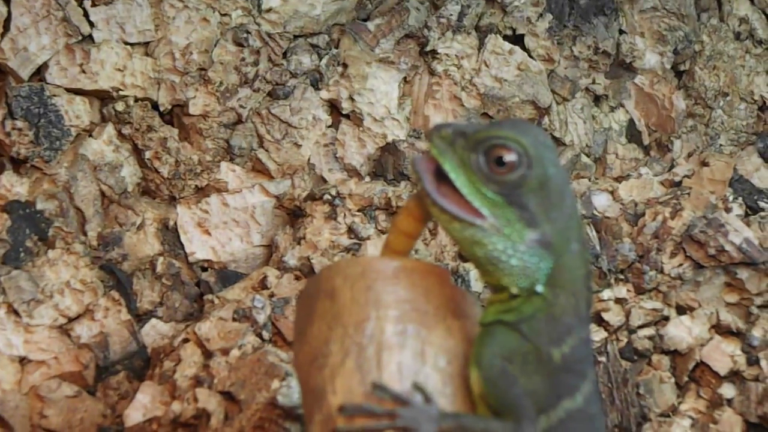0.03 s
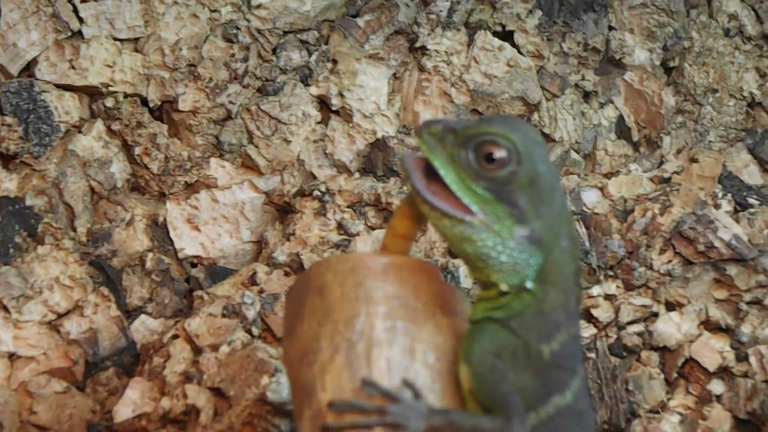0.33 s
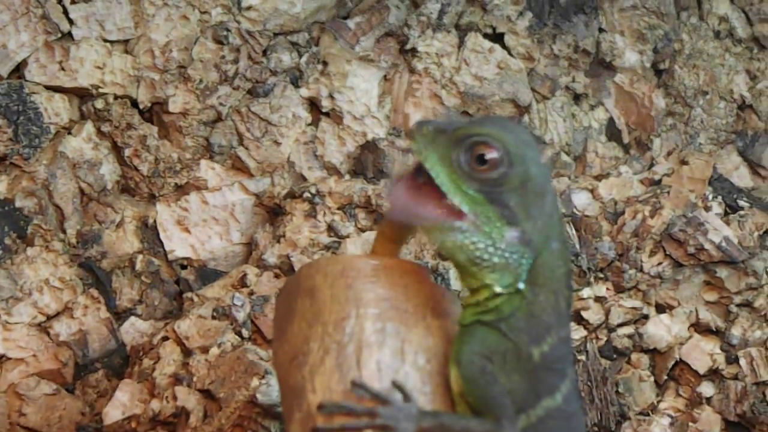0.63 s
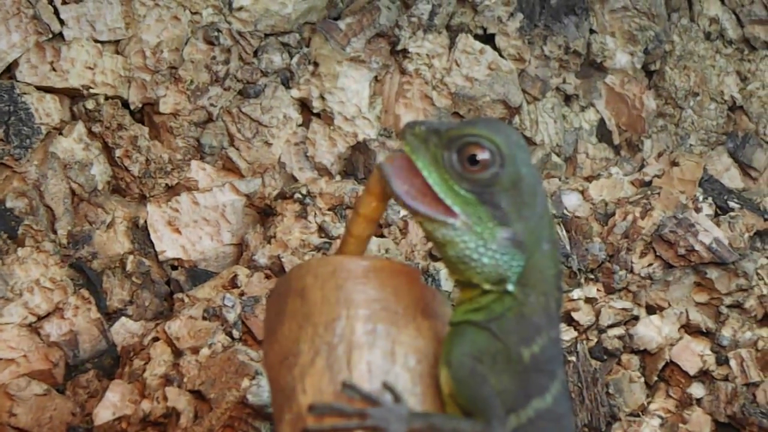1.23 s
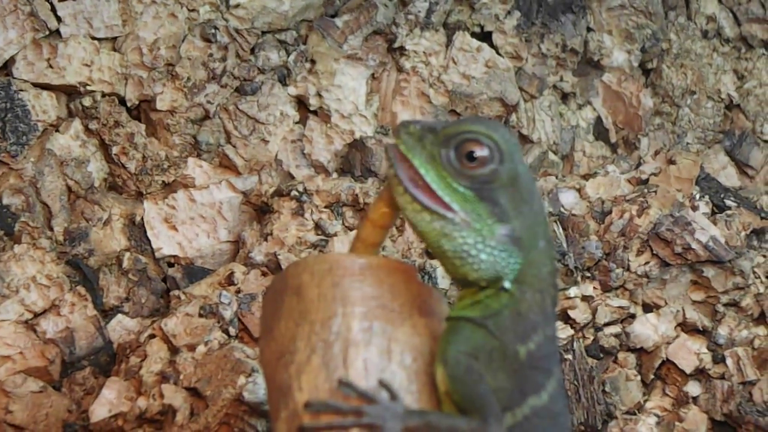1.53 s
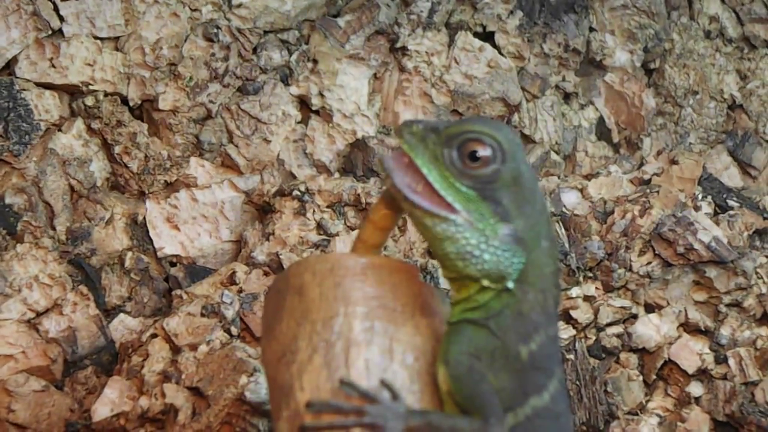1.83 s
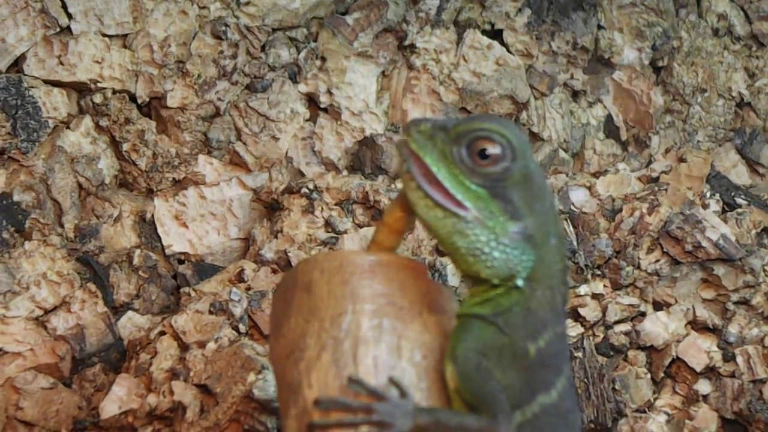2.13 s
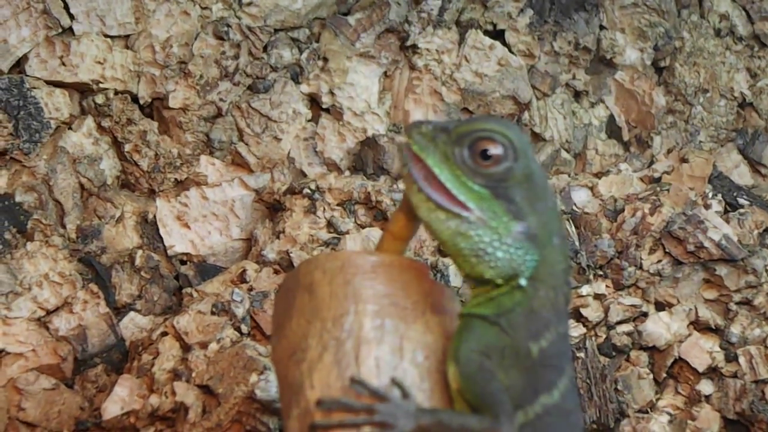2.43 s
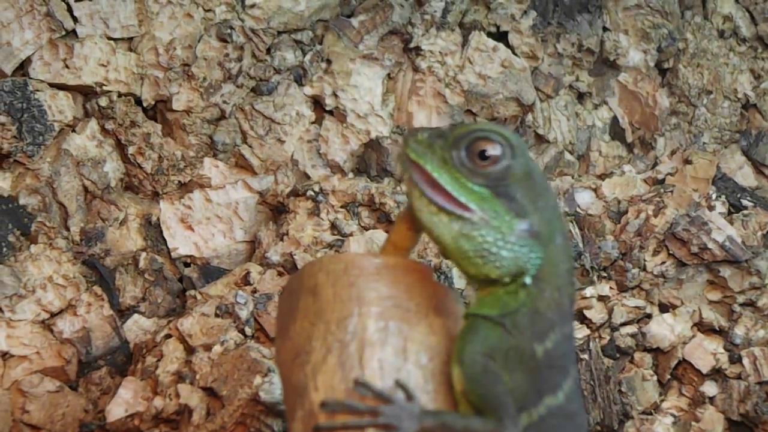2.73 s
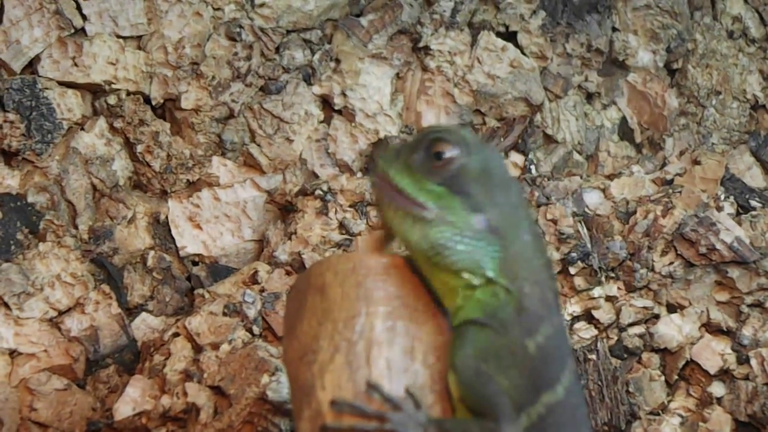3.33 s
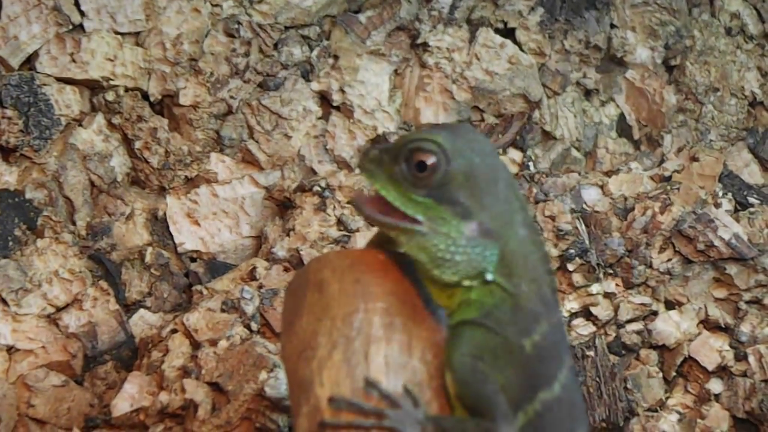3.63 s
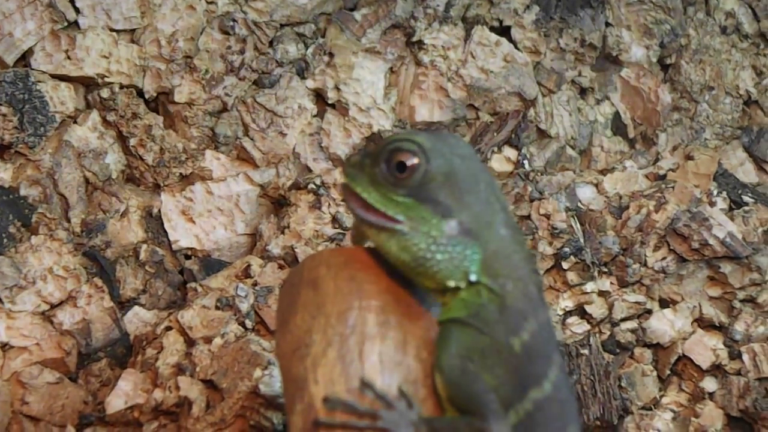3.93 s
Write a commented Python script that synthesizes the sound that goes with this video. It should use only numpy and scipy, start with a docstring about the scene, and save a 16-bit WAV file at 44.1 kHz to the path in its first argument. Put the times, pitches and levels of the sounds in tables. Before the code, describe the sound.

A lizard chews an insect close to the microphone in a tank. A quick run of soft crunches comes first, then scattered sharp cracks of shell, each with a slight ring, over a wavering hiss and faint low hum.

```python
"""In a tank, a lizard chews an insect close to a small microphone that rings near 3 kHz and 9 kHz.
The shell gives way in soft crunches and a few sharp cracks: impulses, each with a short rattle of
wall reflections, that strike those resonances. Behind it: a wavering resonant hiss, rumble, hum and
a low drone, faint rustles of the jaw, two dull bumps and a very faint tick once a second."""
import sys
import numpy as np
from scipy import signal
from scipy.fft import rfft, irfft
from scipy.io import wavfile
from scipy.ndimage import uniform_filter1d

SR = 44100
rng = np.random.default_rng(int(sys.argv[2]) if len(sys.argv) > 2 else 0)


def unload_audio(sound):
    """Save the sound as a 16-bit wav file, at the path given as the first command line argument."""
    columns = np.transpose(np.atleast_2d(sound))
    # keep every value between -1 and 1, then stretch to whole-number steps
    steps = np.round(np.clip(columns, -1, 1) * 32767)
    wavfile.write(sys.argv[1], SR, steps.astype(np.int16))


N = 176400

# spectral shapes (frequency [Hz], relative level [dB])
WHISTLE_SHAPE = [(1500, -42.5), (2300, -41), (2600, -27), (2800, -8), (2920, -4.5), (3015, 4), (3090, -2.5),
                 (3250, -11), (3500, -23.5), (3850, -41.5), (4300, -61)]  # 3 kHz resonance of the hiss
HISS_SHAPE = [(300, -47), (600, -13), (800, -14), (950, -7), (1200, -8), (1420, 1.5), (1650, 2.5),
              (2120, -0.5), (2380, 8), (2600, 6), (3800, -3), (4250, -17), (4650, -10.5), (5000, -10.5),
              (5400, -13), (5700, -27), (6000, -9), (6400, -15.5), (6750, -8), (7250, -13.5), (7550, -8.5),
              (8500, -10.5), (9300, -19.5), (10500, -28), (16000, -44)]
RUMBLE_SHAPE = [(15, -7.5), (30, 4), (55, -4.5), (75, -8), (100, -13), (170, -15), (260, -14), (400, -12.5),
                (520, -22), (1000, -21.5), (5000, -27.5), (12000, -32), (16000, -34)]
RUSTLE_SHAPE = [(3000, -24), (6000, -12), (7600, 2.5), (8700, 1), (10000, -9), (12000, -23), (16000, -26)]
RASP_SHAPE = [(200, -11), (750, -11), (1050, 8), (2300, -19), (3600, 18.5), (4200, -14), (4900, -5),
              (5600, -7), (6500, 6), (8200, 0), (9500, -7), (11500, -31), (16000, -36)]
KNOCK_SHAPE = [(100, -22), (650, -17), (1180, -15), (1370, 2), (1700, 4), (2100, -1), (2400, 2.5),
               (3500, -4), (4150, -15), (4500, -36), (9000, -41)]
SNAP_SHAPE = [(500, -44), (5500, -34), (6800, -10), (7500, -4.5), (8000, 2), (9000, 4.5), (9700, 1),
              (10600, -12), (11500, -26), (14800, -19), (15600, -16), (18000, -18)]
# envelopes (time [s], level [dB])
WHISTLE_ENVELOPE = [(0.0, -33.5), (0.11, -38), (0.14, -29.5), (0.275, -38.5), (0.288, -31), (0.34, -29),
                    (0.375, -42.5), (0.43, -33), (0.47, -34), (0.5, -32), (0.52, -33), (0.54, -29),
                    (0.63, -38), (0.68, -29.5), (0.76, -37), (0.8, -30), (0.84, -40), (0.87, -30),
                    (0.93, -30.5), (1.06, -36.5), (1.075, -30), (1.145, -37.5), (1.18, -30.5),
                    (1.215, -33.5), (1.25, -43.5), (1.31, -30), (1.545, -35), (1.56, -30.5), (1.6, -37),
                    (1.635, -31.5), (1.68, -34.5), (1.75, -28.5), (1.87, -33.5), (1.935, -35),
                    (1.95, -30.5), (2.03, -33), (2.16, -32), (2.2, -38.5), (2.285, -30), (2.34, -39),
                    (2.38, -32), (2.43, -31.5), (2.45, -37), (2.52, -33.5), (2.67, -36.5), (2.682, -30),
                    (2.78, -33.5), (2.825, -29.5), (2.855, -34), (2.88, -29.5), (2.91, -36), (2.97, -30.5),
                    (3.0, -36.5), (3.25, -36.5), (3.26, -32), (3.33, -33.5), (3.35, -32.5), (3.38, -39.5),
                    (3.53, -30.5), (3.55, -40.5), (3.59, -38.5), (3.65, -31), (3.71, -32), (3.785, -41.5),
                    (3.798, -30), (3.84, -32), (3.88, -40), (3.92, -30.5), (4.0, -41)]  # before WHISTLE_TRIM_DB
HISS_ENVELOPE = [(0, -45.5), (.17, -42), (.38, -43), (.52, -43.5), (.61, -42.5), (.92, -42), (1.24, -44),
                 (1.32, -42), (1.55, -42.5), (1.8, -42), (2.2, -42.5), (2.55, -43), (2.78, -41.5),
                 (3.13, -44), (3.42, -43.5), (3.67, -41.5), (3.76, -42.5), (4, -42)]
DRONE_ENVELOPE = [(0, -65), (.45, -55), (.63, -61.5), (.95, -50.5), (1.4, -62), (2.2, -64.5), (3, -64.5),
                  (3.36, -57), (4, -65.5)]
# electrical hum and whine (frequency [Hz], rms level [dB])
HUM_LINES = [(150, -66.5), (200, -66.5), (225, -65.5), (249, -69.5), (300, -72), (11364, -74.5)]
# jaw rustles (centre [s], length [s], level [dB])
JAW_RUSTLES = [(0.404, .2, -57), (0.715, 0.066, -53.5), (1.168, 0.15, -55.5), (2, .14, -56),
               (2.823, 0.14, -56.5), (3.026, 0.093, -57), (3.693, 0.19, -59)]
# soft crunches, plus the grainy bite of the sharp cracks at 0.77 s and 3.35 s (time [s], rasp [dB], ring [dB],
# ring frequency [Hz])
CRUNCHES = [(0.5461, -29.5, -20.5, 3100), (0.5625, -30, -23.5, 3200), (0.647, -29, -24.5, 3300),
            (0.6623, -34, -21, 3300), (.7410, -40, -20, 3330), (0.7574, -32, -28, 3180),
            (0.7704, -29, -23, 3050), (.8500, -32.5, -43, 3170), (0.8627, -32, -21, 3100),
            (.8690, -36, -21, 3140), (0.881, -34, -15, 3150), (0.9855, -34, -17.5, 3270),
            (1.0163, -28.5, -14, 3200), (3.2543, -42, -31, 3950), (3.3463, -36, -19, 3800)]
# sharp cracks (time [s], knock [dB], ring [dB], snap [dB], snap centre [Hz], tilt above it [dB/octave])
SHELL_CRACKS = [(0.729, -50, -44, -31.5, 8700, 6), (0.7703, -19.5, -29, -23, 8950, 2),
                (1.392, -56, -50, -40, 9050, 0), (2.0262, -56, -41, -35, 8600, 0),
                (2.321, -28, -45, -29, 9100, 8), (2.3249, -25.5, -49, -14.5, 9230, 6),
                (2.657, -56, -47, -36.5, 8500, 0), (2.9696, -33, -22, -18, 9000, -6),
                (2.9723, -38, -15, -11, 9080, -11), (3.2575, -31, -32, -40.5, 8800, 0),
                (3.302, -43, -19, -28, 8450, -4), (3.3094, -54, -36, -30, 8900, -2),
                (3.3462, -12.5, -14.5, -16.5, 8450, -5), (3.7951, -48, -24, -24.5, 8900, -6),
                (3.811, -45, -29, -22.5, 8960, -6)]
# high modes rung by each snap (frequency [Hz], relative level [dB], T60 [s])
CAVITY_MODES = [(7830, -15, 0.049), (7873, -39, 0.12), (8000, -38, 0.089), (9400, -27, 0.04),
                (8950, -25, 0.044), (9700, -12, 0.021)]
# dull bumps (time [s], frequency [Hz], level [dB])
DULL_BUMPS = [(.97, 335, -48), (3.336, 385, -50.5)]

WHISTLE_TRIM_DB, WHISTLE_FLICKER_DB, HISS_FLICKER_DB = 0.47, 0.8, 1.34
RUMBLE_DB, DRONE_HZ = -52.5, 65
WALL_ECHO_RANGE_S = (0.002215, 0.002325)
SNAP_SHAPE_CENTRE_HZ, CAVITY_RE_SNAP_DB = 9000, -6
TICK_FIRST_S, TICK_PERIOD_S = 0.735, 1.003
LOWPASS_HZ = 15900


def undb(db):
    """Decibels to gain."""
    return 10 ** (np.asarray(db) / 20)


def unit_rms(x):
    """Scale to rms 1."""
    return x / np.sqrt(np.mean(x ** 2))


def envelope(points):
    """Gain over time from (time [s], level [dB])."""
    return undb(np.interp(np.arange(N) / SR, *np.array(points).T))


def log_gain(shape, size):
    """Natural-log gain of a spectral shape on an FFT grid."""
    hz, db = np.array(shape).T
    grid_hz = np.maximum(np.arange(size // 2 + 1) * SR / size, 1)
    return np.log(undb(np.interp(np.log(grid_hz), np.log(hz), db)))


def noise(shape):
    """Shaped noise, rms 1."""
    white = rfft(rng.standard_normal(N))
    return unit_rms(irfft(white * np.exp(log_gain(shape, N)), N))


def steady(x, window_s=0.04):
    """Even out the slow chance swells of a noise."""
    return x / np.sqrt(uniform_filter1d(x ** 2, int(window_s * SR)))


def waver(rate_hz):
    """Smooth random motion, rms 1."""
    hold = max(int(SR / rate_hz), 2)
    steps = rng.standard_normal(N)[np.arange(N) // hold]
    return unit_rms(uniform_filter1d(steps, hold))


def response(shape, size=1024):
    """Minimum-phase impulse response of a spectral shape, peak 1."""
    cepstrum = irfft(log_gain(shape, size))
    cepstrum[1:size // 2] *= 2
    cepstrum[size // 2 + 1:] = 0
    pulse = irfft(np.exp(rfft(cepstrum)))
    return pulse / np.abs(pulse).max()


def add(out, start_s, sound):
    """Mix a sound in at start_s."""
    i = int(start_s * SR)
    out[i:i + len(sound)] += sound[:N - i]


def hiss():
    """Broad hiss and its strong 3 kHz resonance, flickering together."""
    flicker = waver(rate_hz=45)
    whistle = steady(noise(WHISTLE_SHAPE)) * envelope(WHISTLE_ENVELOPE)
    whistle *= undb(WHISTLE_TRIM_DB + WHISTLE_FLICKER_DB * flicker)
    broad = noise(HISS_SHAPE) * envelope(HISS_ENVELOPE) * undb(HISS_FLICKER_DB * flicker)
    return whistle + broad


def room():
    """Rumble, electrical hum with a thin whine, and a wavering low drone."""
    t = np.arange(N) / SR
    hum = sum(undb(db) * np.sin(2 * np.pi * hz * t + 0.84 * waver(rate_hz=4)) for hz, db in HUM_LINES)
    drone = envelope(DRONE_ENVELOPE) * np.sin(2 * np.pi * DRONE_HZ * t + 1.1 * waver(rate_hz=6.3))
    return undb(RUMBLE_DB) * noise(RUMBLE_SHAPE) + np.sqrt(2) * (hum + drone)


def rustles(grain_db=0.69):
    """The jaw works: soft, slightly grainy swells of high rubbing noise."""
    t = np.arange(N) / SR
    swells = sum(undb(db) * np.exp(-2 * ((t - centre_s) / length_s) ** 2)
                 for centre_s, length_s, db in JAW_RUSTLES)
    return swells * noise(RUSTLE_SHAPE) * undb(grain_db * waver(rate_hz=260))


def fracture(tail_db, t60_s, rise_s=0.00026, size=4096):
    """One impulse and its dense, dying reflections from the tank walls."""
    t = np.arange(size) / SR
    onset = 1 - np.exp(-(t / rise_s) ** 2)
    tail = rng.standard_normal(size) * undb(-60 * t / t60_s) * onset
    return (t == 0) + undb(tail_db) * tail / np.sqrt(np.sum(tail ** 2))


def microphone_ring(hz, width_hz, echo_db=-7.5, size=1024):
    """A steep resonance, struck directly, off the nearest wall and by weak reflections."""
    strikes = fracture(tail_db=-4, t60_s=0.034)
    add(strikes, rng.uniform(*WALL_ECHO_RANGE_S), undb([echo_db]))
    t = np.arange(size) / SR
    age = np.pi * width_hz * t  # swell peaks at age 1
    resonance = (age * np.exp(1 - age)) ** 2 * np.sin(2 * np.pi * hz * t)
    return signal.fftconvolve(strikes, resonance)


def crunches():
    """The jaw crushes softer parts: dull, grainy clicks that ring the microphone. Two rows give the sharp
    cracks at 0.77 s and 3.35 s their grainy bite."""
    out, rasp = np.zeros(N), response(RASP_SHAPE)
    for start_s, rasp_db, ring_db, ring_hz in CRUNCHES:
        add(out, start_s, undb(rasp_db) * signal.fftconvolve(fracture(tail_db=5, t60_s=0.019), rasp))
        add(out, start_s, undb(ring_db) * microphone_ring(ring_hz, width_hz=430))
    return out


def mode(hz, db, t60_s, size=4096):
    """A struck mode: a decaying sine."""
    t = np.arange(size) / SR
    return undb(db - 60 * t / t60_s) * np.sin(2 * np.pi * hz * t)


def cracks():
    """The shell breaks: a woody knock, a ring near 3 kHz and a bright snap with high modes."""
    out, knock = np.zeros(N), response(KNOCK_SHAPE)
    cavity = sum(mode(*row) for row in CAVITY_MODES)
    snap_ratios = [(hz / SNAP_SHAPE_CENTRE_HZ, db) for hz, db in SNAP_SHAPE]
    for start_s, knock_db, ring_db, snap_db, centre_hz, tilt_db_per_oct in SHELL_CRACKS:
        snap = response([(ratio * centre_hz, db + tilt_db_per_oct * max(np.log2(ratio), 0))
                         for ratio, db in snap_ratios])
        body = undb(knock_db) * knock + undb(snap_db) * snap
        add(out, start_s, signal.fftconvolve(fracture(tail_db=2, t60_s=0.036), body))
        add(out, start_s, undb(ring_db) * microphone_ring(hz=2830, width_hz=410))
        add(out, start_s, undb(snap_db + CAVITY_RE_SNAP_DB) * cavity)
    return out


def soft_mode(hz, db, t60_s, rise_s=0.016):
    """A gently pushed mode: swells, then fades."""
    t = np.arange(SR // 2) / SR
    return mode(hz, db, t60_s, size=len(t)) * (1 - np.exp(-t / rise_s))


def ticks():
    """A very faint, dull tick once a second, perhaps a clock."""
    out = np.zeros(N)
    for start_s in np.arange(TICK_FIRST_S, N / SR, TICK_PERIOD_S):
        add(out, start_s, soft_mode(hz=888, db=-45, t60_s=0.23))
    return out


def bumps():
    """Dull bumps, probably the wooden perch as the lizard shifts."""
    out = np.zeros(N)
    for start_s, hz, db in DULL_BUMPS:
        add(out, start_s, soft_mode(hz, db, t60_s=0.33))
    return out


def scene():
    """Chewing over the background, mono."""
    return (hiss() + room() + rustles() + crunches() + cracks() + ticks() + bumps())[None]


def record(dry):
    """Steep elliptic low-pass on the top treble."""
    return signal.sosfilt(signal.ellip(10, 0.1, 80, LOWPASS_HZ, fs=SR, output="sos"), dry)


dry = scene()
out = record(dry)
unload_audio(out)
```